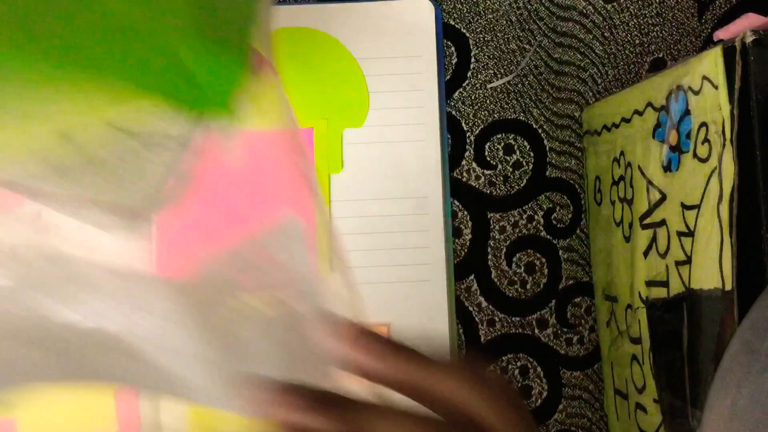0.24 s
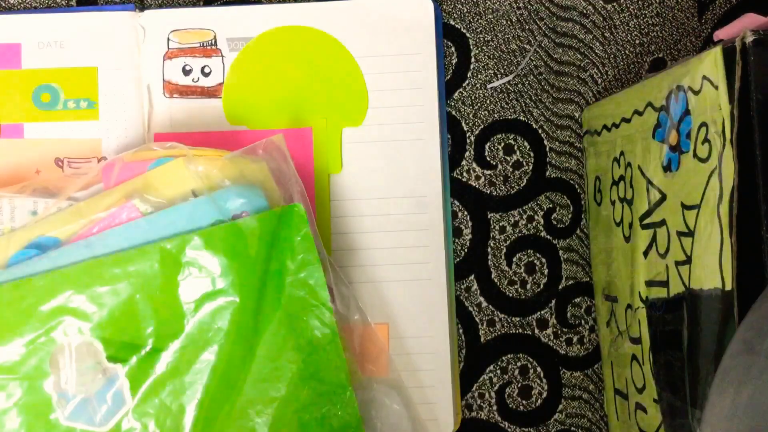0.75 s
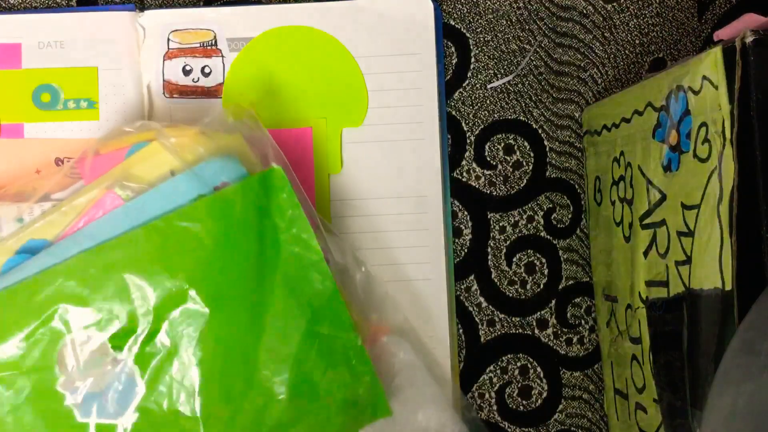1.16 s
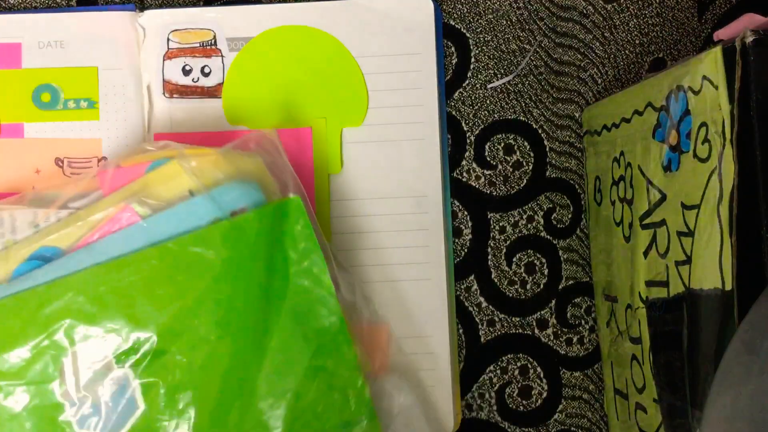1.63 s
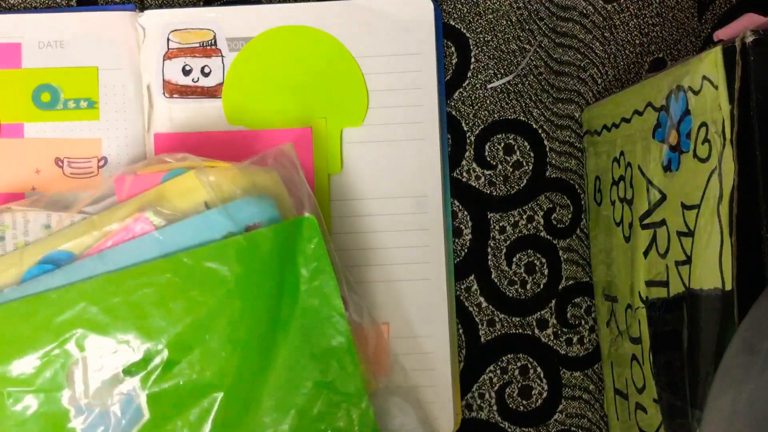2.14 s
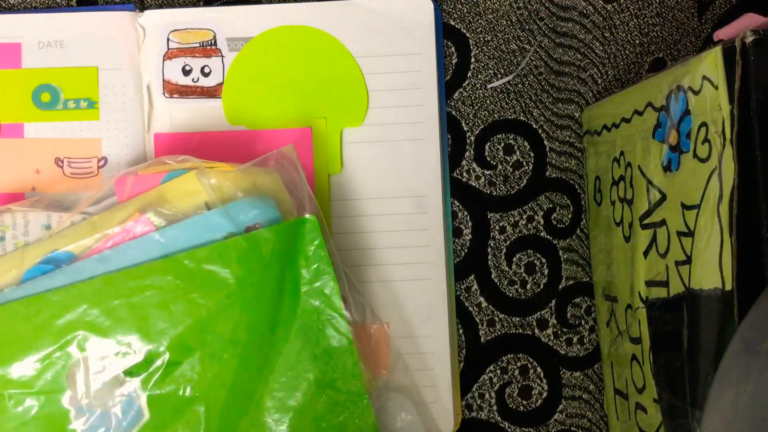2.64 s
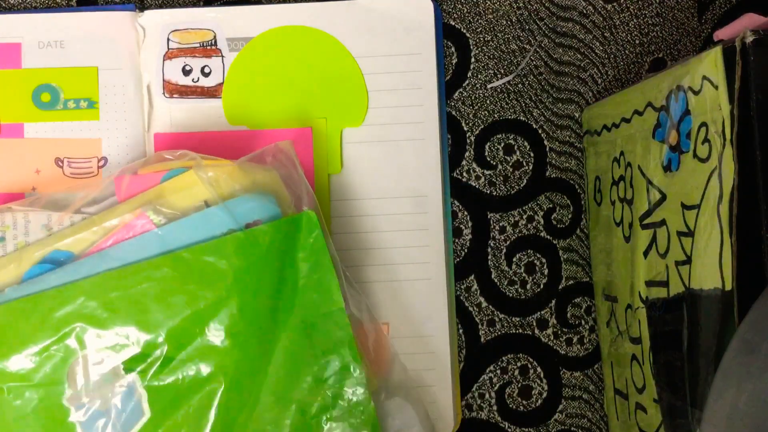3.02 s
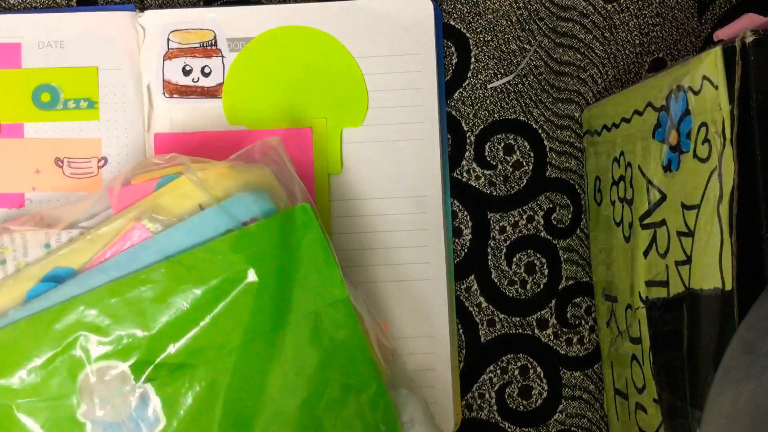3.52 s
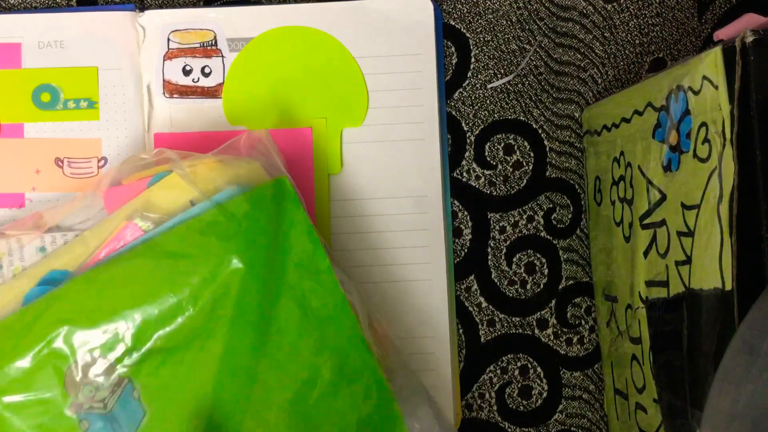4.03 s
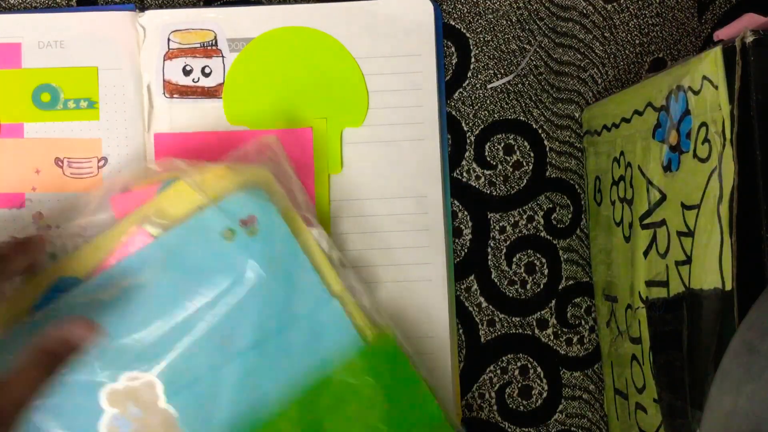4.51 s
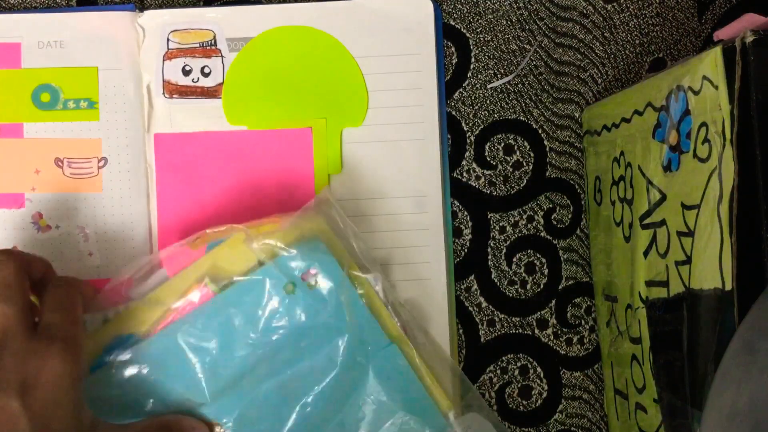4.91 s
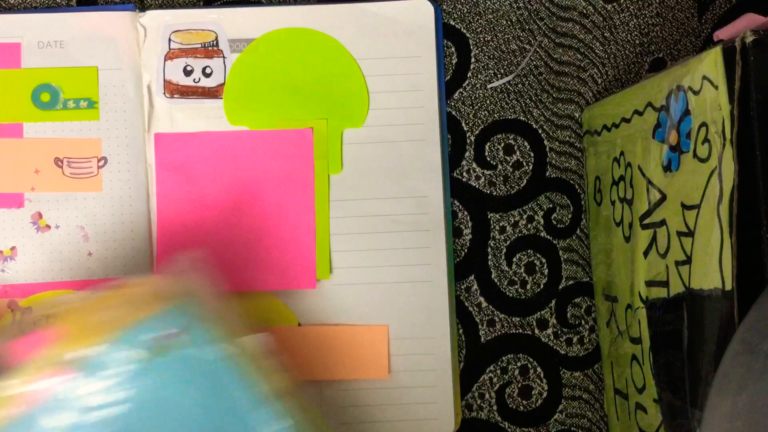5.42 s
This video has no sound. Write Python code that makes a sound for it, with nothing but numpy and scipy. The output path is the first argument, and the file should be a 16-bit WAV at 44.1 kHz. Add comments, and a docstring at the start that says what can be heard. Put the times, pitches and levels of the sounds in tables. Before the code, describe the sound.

A close, dry take in a small quiet room with a very faint low mains hum, rumble and slight hiss. From 0 to 0.3 s a thin plastic packet is carried, with light, quickening crackles. At about 0.35-0.48 s it lands on an open notebook: a loud, crisp flurry of tiny bounces and film snaps with a soft papery knock. Until 2 s it settles in scattered crinkles and short rustles, with dull little thuds near 0.8 and 1.8 s and a faint airy swish around 1.6 s. From 2.0 to 2.8 s it is nearly still, with only tiny ticks. From 2.85 to 4.2 s nudging brings denser, rounder crinkles, strongest near 3.25 s with a soft bump, and a sharp snap at 3.9 s. From 4.3 s a sustained, grainy, bright drag over paper crackles continuously, with brief swishes and soft thuds at 4.6 and 5.1 s, thinning away by 5.65 s.

```python
"""A thin plastic packet of sticky notes is dropped on an open paper notebook, nudged about and then dragged off the page.
Carried, landing and pushed, its film rustles grainily in filtered noise, and creases snap in short ringing bursts.
The landing bounces excite brief resonances, the packet's weight thuds softly, and gliding bands of noise make swishes.
A mains hum, a low rumble and faint hiss fill the small, dry room; one close microphone."""
import sys
import numpy as np
from scipy import signal
from scipy.fft import rfft, irfft, next_fast_len
from scipy.io import wavfile
from scipy.ndimage import uniform_filter1d, map_coordinates

SR = 44100
rng = np.random.default_rng(int(sys.argv[2]) if len(sys.argv) > 2 else 0)


def pcm_store(signal):
    """Save signal as 16-bit PCM."""
    levels = np.round(np.clip(np.atleast_2d(signal), -1, 1) * 32767)
    wavfile.write(sys.argv[1], SR, levels.astype(np.int16).T)


N = 249606


def from_db(db):
    """Decibels to amplitude gain."""
    return 10 ** (np.asarray(db) / 20)


def rms_one(x):
    """Scale to an rms of one."""
    return x / np.sqrt(np.mean(x ** 2) + 1e-20)


def in_time(rows):
    """The columns of a curve table, interpolated at every sample."""
    s, *columns = np.transpose(rows)
    return [np.interp(np.arange(N) / SR, s, column) for column in columns]


def drift(rate):
    """Random wander of spread one, in straight lines between `rate` random points a second."""
    knots = rng.standard_normal(4096)
    wander = np.interp(np.arange(N) / SR * rate, np.arange(len(knots)), knots)
    return wander * np.sqrt(3 / 2)  # makes up for the spread lost between points


def band(x, low_hz, high_hz, order=3):
    """Butterworth band-pass."""
    edges = [low_hz, min(high_hz, SR / 2 - 1000)]
    return signal.sosfilt(signal.butter(order, edges, "band", fs=SR, output="sos"), x)


def coloured(x, spectrum):
    """Give each row of x a smooth spectrum, causally (minimum phase)."""
    size = next_fast_len(x.shape[-1], True) * 2
    hz, db = np.transpose(spectrum)
    bins_hz = np.arange(size // 2 + 1) * SR / size
    log_gain = np.log(from_db(np.interp(np.log(bins_hz + 1), np.log(hz), db)))
    # folding the cepstrum forward in time gives minimum phase
    cepstrum = irfft(log_gain)[:size // 2]
    cepstrum[1:] *= 2
    response = np.exp(rfft(cepstrum, size))
    return irfft(rfft(x, size) * response)[..., :x.shape[-1]]


def resonance(x, hz, width_hz):
    """Two-pole resonance with a gain of one on top."""
    r = np.exp(-np.pi * width_hz / SR)
    top = (1 - r * r) / 2
    return signal.lfilter([top, 0, -top], [1, -2 * r * np.cos(2 * np.pi * hz / SR), r * r], x)


def narrow_noise(hz, width_hz):
    """Noise in a narrow band round a steady or gliding pitch; rms one."""
    lowpass = signal.butter(2, width_hz / 2, fs=SR, output="sos")
    spread = signal.sosfilt(lowpass, rng.standard_normal((2, len(hz))))
    phase = 2 * np.pi * np.cumsum(hz) / SR
    return rms_one(spread[0] * np.cos(phase) + spread[1] * np.sin(phase))


# Colour of the quiet room's noise. Each row: frequency in Hz, relative level in dB.
ROOM_COLOUR = [(20, -4.5), (33, -25), (48, 6), (68, 6), (100, 0), (175, -3), (260, -15), (500, -19),
               (1200, -29.5), (2500, -33.5), (6000, -42), (13000, -39.5), (15500, -57)]
# The room's low rumble. Each row: time in seconds, gain in dB on the lows of the room noise.
RUMBLE_CURVE = [(0, -57.5), (1.3, -61.5), (1.7, -61.5), (2.4, -58), (2.8, -70), (5.66, -64)]
HUM_HZ, HUM_DB, HISS_DB = 119.9, -60.0, -59


def background(waver_db=1.3, blur_db=-12.5, blur_width_hz=28.0):
    """A wavering, slightly blurred mains hum over rumble and faint hiss."""
    tone = np.sqrt(2) * np.sin(2 * np.pi * HUM_HZ * np.arange(N) / SR)
    blur = from_db(blur_db) * narrow_noise(np.full(N, HUM_HZ), blur_width_hz)
    hum = (tone + blur) * from_db(HUM_DB + waver_db * drift(12))
    air = rms_one(coloured(rng.standard_normal(N), ROOM_COLOUR))
    rumble = signal.sosfilt(signal.butter(1, 200, fs=SR, output="sos"), air)
    hiss = air - rumble
    rumble_db, = in_time(RUMBLE_CURVE)
    return hum + from_db(rumble_db) * rumble + from_db(HISS_DB) * hiss


RUSTLE_RISE_SHARE, RELEASE_S = 0.32, 0.035  # a long rustle swells slowly: rise is a share of length
# the film's upper ranges against its body; the crackle takes a share of the brightness
CRACKLE_DB, SIZZLE_DB, CRACKLE_FOLLOWS = -2.5, -13, 0.44


def stroke(start, end, rise_s, db, bright_db):
    """Power of one movement, swelling, holding and dying away, in the body, crackle and sizzle ranges."""
    t = np.arange(N) / SR
    before, after = np.maximum(start - t, 0), np.maximum(t - end, 0)
    envelope = np.exp(-before / rise_s - after / RELEASE_S) + 1e-9
    ranges = (0, CRACKLE_DB + CRACKLE_FOLLOWS * bright_db, SIZZLE_DB + bright_db)
    return np.array([(envelope * from_db(db + range_db)) ** 2 for range_db in ranges])


# Rustles of the film as the packet is carried, lands and is pushed over the page.
# Each row: start in seconds, length in seconds, level in dB before the range gains, brightness in dB.
RUSTLE_ROWS = [(0.015, 0.091, -62, 2.5), (0.2, 0.094, -65.5, 10), (0.361, 0.044, -36, 7),
               (0.412, 0.087, -45, 3.5), (0.52, 0.1, -56.5, 7.5), (0.648, 0.033, -55.5, 1),
               (0.789, 0.1, -56, -1), (0.957, 0.052, -63, 1), (1.086, 0.066, -54, 6),
               (1.176, 0.12, -65, -7), (1.444, 0.16, -58, 6.5), (1.61, 0.098, -58.5, 5.5),
               (1.742, 0.13, -61.5, 2), (1.961, 0.22, -58.5, -17.5), (2.173, 0.11, -63, -24),
               (2.119, 0.036, -72.5, 15), (2.406, 0.037, -67.5, -3), (2.837, 0.1, -55, -8),
               (3.078, 0.16, -51, -5), (3.233, 0.013, -46.5, -4), (3.35, 0.13, -57.5, -4),
               (3.476, 0.061, -50, 1.5), (3.633, 0.049, -60.5, -5), (3.69, 0.08, -73.5, 9),
               (3.91, 0.12, -52, 2.5), (4.095, 0.07, -60, 5)]
# The long drag off the page. Each row: time in seconds, level in dB before the range gains, brightness in dB.
DRAG_CURVE = [(4.2, -59.5, -4), (4.28, -59.5, 11), (4.43, -47.5, 8.5), (4.7, -45, 6), (4.8, -47.5, 9.5),
              (4.93, -50.5, 2), (5.07, -47, 15), (5.14, -47, 9), (5.27, -48.5, 8.5), (5.4, -50.5, 2),
              (5.52, -55, -6.5), (5.657, -69.5, 11)]
DRAG_RISE_S = 0.02
RESTING_DB, RESTING_BRIGHT_DB = -84, -7  # the film stirs faintly throughout


def rubbing_levels():
    """Rustles, then the drag, over a faint resting stir; dB in the body, crackle and sizzle ranges."""
    end = (N - 1) / SR
    power = stroke(0, end, DRAG_RISE_S, RESTING_DB, RESTING_BRIGHT_DB)
    power += stroke(DRAG_CURVE[0][0], end, DRAG_RISE_S, *in_time(DRAG_CURVE))
    for s, length, db, bright_db in RUSTLE_ROWS:
        power += stroke(s, s + length, RUSTLE_RISE_SHARE * length, db, bright_db)
    return 10 * np.log10(power)


# the rate of buckling at a reference rubbing level, and how far it follows that level
CRINKLES_PER_S, CRINKLES_AT_DB, CRINKLES_FOLLOW = 190.0, -48.0, 0.45


def buckling(level_db, size_db=5.0):
    """Small creases buckle at random moments, more often the harder the film is rubbed."""
    sizes = from_db(size_db * rng.exponential(1, N).clip(0, 2.8))
    per_s = CRINKLES_PER_S * from_db(CRINKLES_FOLLOW * (level_db - CRINKLES_AT_DB))
    return (rng.random(N) < per_s / SR) * sizes * rng.choice([-1, 1], N)


def crinkles(buckles, low_hz, high_hz, facet_q=7.4, click_db=-17.5, count=16):
    """Each buckle clicks and rings up to three of the film's many facets in this range."""
    dealt = rng.integers(0, count, (3, N))
    rings = np.zeros(N)
    for k, hz in enumerate(np.geomspace(high_hz / 4, high_hz * .9, count)):
        struck = buckles * (dealt == k).any(axis=0) + 1e-18
        rings += resonance(struck, hz, hz / facet_q) * (-1) ** k
    return rings + from_db(click_db) * buckles


# Colour of film on paper, heard in rubbing and snaps. Each row: frequency in Hz, relative level in dB.
FILM_COLOUR = [(100, 11), (200, 0.5), (330, 0), (480, -5), (680, 0.5), (1100, 0), (1600, -4.5), (2500, -5),
               (4000, -7.5), (6000, -9), (8500, -11.5), (12500, -14), (14500, -20), (16000, -31)]
# The body, crackle and sizzle ranges of the film, for rubbing and snaps. Each row: low edge in Hz, high edge
# in Hz, snap decay in seconds, snap gain in dB, rubbing gain in dB, weight of crinkles from 0 to 1.
FILM_RANGES = [(147, 1380, 0.0048, -3, -0.63, 0.92), (1305, 4860, 0.0041, -0.5, -3.5, 1.0),
               (4730, 14800, 0.0017, -0.5, -0.5, 0.67)]
# How much of the rubbing is crinkling rather than smooth sliding.
# Each row: time in seconds, share from 0 to 1 before the range's weight.
CRINKLING_CURVE = [(0, 0.4), (.35, 0.37), (1.2, 0.33), (1.45, 0.24), (1.7, 0.14), (2.25, 0.4), (2.8, 0.75),
                   (4.1, 0.76), (4.3, 0.16), (4.8, 0.45), (5.6, 0.43)]


def rubbing(slips_per_s=380.0, slip_db=2.0, slip_s=0.0019, smooth_share=0.45, flutter_db=3.5, jerk_db=1.9):
    """Tiny slips crowd into a grainy friction hiss, and small creases crinkle among them."""
    slip_power = from_db(slip_db * np.minimum(rng.exponential(1, N), 4)) ** 2
    slips = (rng.random(N) < slips_per_s / SR) * slip_power
    power = signal.lfilter([1], [1, -np.exp(-1 / (slip_s * SR))], slips + 1e-18)
    smooth = np.clip(smooth_share, 0, 1)
    grain = np.sqrt(smooth + (1 - smooth) * power / power.mean())
    crinkling, = in_time(CRINKLING_CURVE)
    levels_db = rubbing_levels()
    buckles = buckling(levels_db[0])
    out = np.zeros(N)
    for (low, high, _, _, rub_db, weight), level_db in zip(FILM_RANGES, levels_db):
        share = np.clip(weight * crinkling, 0, 1)
        flutter = from_db(flutter_db * np.sqrt(share) * drift(70))
        friction = grain * rng.standard_normal(N) * flutter
        layers = np.array([friction, crinkles(buckles, low, high)])
        friction, crinkle = band(coloured(layers, FILM_COLOUR), low, high)
        # even out the crinkles' average strength so that it follows the rubbing
        crinkle = rms_one(crinkle)
        crinkle /= np.sqrt(uniform_filter1d(crinkle ** 2, SR // 16) + .02)
        mix = np.sqrt(1 - share) * rms_one(friction) + np.sqrt(share) * crinkle
        out += from_db(level_db + rub_db) * mix
    # the packet moves in small jerks
    return out * from_db(jerk_db * crinkling * drift(55))


def page_echo(x, delay_s=0.000796, wander=0.34, echo_db=-16.5):
    """The page reflects the packet; the gap between them keeps changing, and the colour with it."""
    gain = from_db(echo_db)
    delay = delay_s * SR * np.exp(wander * drift(7.6))
    echo = map_coordinates(x, [np.arange(N) - delay], order=3)
    return (x + gain * echo) / np.sqrt(1 + gain ** 2)


# The loudest creases snapping. Each row: time of the buckle in seconds, strength in dB before the range gains,
# sizzle relative to strength in dB, pitch of the facet in Hz.
SNAP_ROWS = [(0.029, -61, 5, 6290), (0.0381, -54, -11, 2190), (0.055, -59, 5, 1090),
             (0.0835, -56.5, -5, 2080), (0.119, -57.5, 5.5, 8200), (0.174, -60, -8, 1500),
             (0.1843, -54.5, -13, 2500), (0.2104, -48, -5, 2570), (0.232, -58, -7, 3300),
             (0.2612, -54, -7, 3190), (0.2746, -60, -19, 1440), (0.2888, -45, -8, 2080),
             (0.3158, -50, -1, 2000), (0.3449, -43.5, 4, 910), (0.349, -41.5, 4.5, 990),
             (0.373, -40, -0.5, 5700), (0.388, -36.5, -6, 2390), (0.398, -37, -12, 1470),
             (0.416, -42, -5, 4370), (0.4345, -43, -19, 2300), (0.4688, -40, -12, 2300),
             (0.481, -45, -3, 3420), (0.558, -44, -7, 880), (0.662, -45.5, -31, 990),
             (0.7063, -55, -17, 2380), (0.7614, -54, -5, 1080), (0.8103, -55, -20, 1290),
             (0.8451, -46.5, -9, 3120), (0.8787, -64, -19, 1030), (0.9599, -48.5, -1, 3230),
             (0.9961, -49, -1.5, 2260), (1.006, -47, -0.5, 4630), (1.0945, -44, -9.5, 2700),
             (1.1041, -44.5, -16, 3740), (1.1205, -42, -2.5, 3500), (1.1481, -44.5, -1, 3800),
             (1.1768, -57, -15, 3360), (1.2536, -48.5, -2, 3160), (1.2665, -60.5, 0, 6200),
             (1.3583, -70, 7.5, 9400), (1.3777, -57.5, -24, 765), (1.456, -56, -11, 1200),
             (1.494, -48.5, -3, 3650), (1.5096, -50.5, -4, 5150), (1.5932, -52, -19, 1550),
             (1.7438, -54, -18, 2290), (1.77, -42.5, -6.5, 2450), (1.821, -43.5, -12.5, 1380),
             (1.8543, -57.5, -7, 3120), (1.881, -49, -23, 1310), (1.9382, -63, -20, 1120),
             (1.9827, -51.5, -11.5, 1790), (2.0957, -64, -16, 1200), (2.1327, -50.5, 7, 11400),
             (2.2105, -54.5, -26, 1260), (2.2222, -60, -11, 4200), (2.402, -60.5, -14, 3360),
             (2.4628, -61.5, -10, 3560), (2.477, -67, -15, 3200), (2.5715, -67.5, 6, 4200),
             (2.848, -48.5, -2, 714), (2.8701, -51, -21, 1120), (2.8809, -46.5, -10, 590),
             (2.8929, -49.5, -4, 1530), (2.9285, -42, -8, 1190), (2.9412, -46.5, 5, 6900),
             (2.951, -41.5, -7, 1140), (2.9966, -46.5, 1, 3020), (3.015, -63, -15, 2150),
             (3.0473, -52, -23, 1220), (3.0639, -44.5, -16, 1870), (3.0697, -51, 3, 9000),
             (3.077, -43, 3.5, 2480), (3.1167, -43.5, -12, 1570), (3.158, -43, -1.5, 2330),
             (3.1715, -57, -19, 1130), (3.214, -44.5, 0.5, 2410), (3.2416, -38, -22, 550),
             (3.254, -37.5, -17, 735), (3.28, -43.5, -33, 1340), (3.2961, -49, -3, 603),
             (3.3397, -40, -8.5, 3100), (3.3612, -48.5, -14, 3050), (3.402, -51.5, -24, 2320),
             (3.4147, -49, -22, 1800), (3.428, -54.5, -8, 1880), (3.4535, -45, -11, 1940),
             (3.4828, -45, -0.5, 2660), (3.5237, -41, -12, 1010), (3.551, -48, -23, 1500),
             (3.641, -51, -24, 950), (3.6545, -49, -14, 1000), (3.6604, -48, -2, 1020),
             (3.6816, -54, -12, 1470), (3.86, -46.5, -24, 1070), (3.9012, -37.5, -7, 630),
             (3.924, -44.5, 4, 1020), (3.9365, -41.5, -1.5, 4700), (3.9523, -57, 2, 1160),
             (3.9632, -51, -3, 2325), (4.0322, -51, -7, 5000), (4.0555, -50.5, 4.5, 4170),
             (4.119, -52, -20, 1110), (4.1345, -57, -18, 1820), (4.1656, -39.5, -11.5, 1530),
             (4.244, -46.5, -30, 900), (4.29, -53, -9, 1070), (4.3677, -57.5, 0, 3900),
             (4.4314, -44, -3, 563), (4.4358, -44.5, 2.5, 585), (4.465, -47.5, 3, 1200),
             (4.481, -47, 6.5, 9600), (4.5093, -43, -3, 646), (4.558, -51, 3, 2870),
             (4.6046, -41, -1, 1260), (4.6525, -33.5, -14, 1850), (4.659, -44, -22, 1680),
             (4.712, -41, -8, 1000), (4.7271, -43, 0, 7160), (4.7549, -43.5, -3, 2200),
             (4.848, -50, -1, 1080), (4.8816, -48, -19, 3600), (4.911, -36, -32, 960),
             (4.964, -44.5, -3, 930), (4.982, -46.5, -2, 2380), (5.0086, -40.5, -7, 2470),
             (5.0127, -41.5, -2, 4340), (5.023, -37, -20, 1270), (5.03, -41, -22, 1180),
             (5.0545, -42.5, -20, 1920), (5.0783, -52, 18, 9000), (5.085, -38.5, -0.5, 1240),
             (5.135, -40, -7, 890), (5.1625, -35, -5, 1100), (5.202, -45.5, -7, 3680),
             (5.2422, -38, -24, 1570), (5.2533, -35, -9.5, 1610), (5.289, -46, 4, 10000),
             (5.338, -37, -10, 1130), (5.393, -49.5, -4, 2450), (5.4095, -58.5, 12.5, 5570),
             (5.4203, -41, -22, 1560), (5.445, -72, -12, 3790), (5.4678, -43.5, -28, 2240),
             (5.4926, -37.5, -11.5, 1040), (5.5111, -47, -22, 1700), (5.5438, -50.5, -15, 2520),
             (5.5911, -44.5, -30, 1700), (5.621, -55, -7, 5800)]
# the smaller the facet, the higher it rings and the more it crackles against the body
MIDDLE_FACET_HZ, CRACKLE_GAIN_DB_PER_OCTAVE = 1516, 2


def snap_levels():
    """Level of every snap in the body, crackle and sizzle ranges, in dB before the range gains."""
    _, db, sizzle_db, hz = np.transpose(SNAP_ROWS)
    octaves = np.clip(np.log2(hz / MIDDLE_FACET_HZ), -.5, 1.3)
    return db, db + CRACKLE_GAIN_DB_PER_OCTAVE * octaves, db + sizzle_db


def snaps(facet_db=12.5, facet_q=5.2, tail_db=-21.5, tail_s=0.021,
          neighbour_db=9.5, neighbour_q=27.0, neighbour_octaves=0.707,
          lead_in_db=-13.0, lead_in_s=0.0061, crack_db=4.0, crack_s=0.00053):
    """A crease buckles and dies in milliseconds; its facet rings at its own pitch and a neighbour joins in."""
    lead = SR // 100  # samples before the buckle
    table = np.array(SNAP_ROWS)
    times, facets_hz = table[:, 0], table[:, 3]
    t = (np.arange(2560) - lead) / SR
    age = abs(t)
    out = np.zeros(N + len(t))
    detune = 2 ** (neighbour_octaves * rng.uniform(-1, 2, len(table)))
    neighbours_hz = np.minimum(facets_hz * detune, SR / 3)
    # noise swells for a few milliseconds before each snap
    lead_in = from_db(lead_in_db) * np.exp(-age / lead_in_s)
    for (low, high, decay_s, snap_db, _, _), levels_db in zip(FILM_RANGES, snap_levels()):
        # a sharp crack, the buckle itself, then a faint shiver spreading through the film
        crack = from_db(crack_db) * np.exp(-age / crack_s)
        shiver = from_db(tail_db) * np.exp(-age / tail_s)
        envelope = np.where(t < 0, lead_in, crack + np.exp(-age / decay_s) + shiver)
        bursts = rng.standard_normal((len(table), len(t))) * envelope
        for i, (hz, near_hz) in enumerate(zip(facets_hz, neighbours_hz)):
            facet = from_db(facet_db) * resonance(bursts[i], hz, hz / facet_q)
            neighbour = from_db(neighbour_db) * resonance(bursts[i], near_hz, near_hz / neighbour_q)
            bursts[i] += facet + neighbour
        bursts = band(coloured(bursts, FILM_COLOUR), low, high)
        # level is set over the first 5 ms of the buckle
        bursts /= bursts[:, lead:lead + SR // 200].std(axis=1, keepdims=True)
        for s, db, burst in zip(times, levels_db, bursts):
            start = int(np.clip(s * SR - lead, 0, N))
            out[start:start + len(t)] += from_db(db + snap_db) * burst
    return out[:N]


# The packet lands in a quick run of bounces.
# Each row: time in seconds, strength in dB before mode levels and scatter.
LANDING_BOUNCES = [(0.348, -29), (0.362, -36.5), (0.380, -22), (0.389, -23), (0.3975, -22), (0.412, -25),
                   (0.429, -29), (0.466, -35)]
# Resonances of the packet on the page. Each row: frequency in Hz, width in Hz, relative level in dB.
PACKET_MODES = [(106, 27, -20.5), (161, 25, -21), (675, 15, -22), (843, 25, -17), (870, 120, -10.5),
                (917, 24, -16.5), (2380, 5.8, -29)]


def landing(scatter_db=-1.5):
    """Every bounce sets the packet's resonances ringing, each with a strength of its own."""
    s, db = np.transpose(LANDING_BOUNCES)
    out = np.zeros(N)
    for hz, width, mode_db in PACKET_MODES:
        contacts = np.full(N, 1e-18)
        scatter = scatter_db * rng.standard_normal(len(s))
        contacts[(s * SR).astype(int)] = from_db(db + mode_db + scatter)
        out += resonance(contacts, hz, width) * SR / (2 * np.pi * width)
    return out


# The weight of the packet shifting on the notebook. Each row: start in seconds, level at the peak in dB.
THUD_ROWS = [(0.376, -52.5), (0.767, -49.5), (1.127, -55), (1.5, -66), (1.8, -54.5), (2.19, -61),
             (2.857, -50.5), (3.252, -46), (4.56, -48), (5.136, -45.5)]


def thuds(low_hz=74.5, high_hz=258.0, swell_s=0.0096):
    """Soft, dull thuds of the packet on the pages: low noise that swells and fades."""
    t = np.arange(N) / SR
    push = np.zeros(N)
    for s, db in THUD_ROWS:
        age = np.maximum(t - s, 0) / swell_s
        push += from_db(db) * age * np.exp(1 - age)
    return push * rms_one(band(rng.standard_normal(N), low_hz, high_hz, order=2))


# Sliding film hisses in narrow bands that glide as it bends.
# Each row: start in seconds, length in seconds, level at the peak in dB, first pitch in Hz, last pitch in Hz.
SWISH_ROWS = [(1.395, 0.15, -74, 11900, 11800), (1.53, 0.21, -67, 11800, 12900),
              (1.534, 0.22, -59.5, 2810, 3080), (1.541, 0.2, -62.5, 4900, 4500),
              (4.547, 0.11, -54, 9350, 9800), (4.761, 0.065, -49.5, 8400, 9800),
              (4.97, 0.061, -55, 12000, 12800)]


def swishes(q=5.2):
    """Each glide of the film is a gliding band of noise that swells and fades smoothly."""
    out = np.zeros(N)
    for s, length, db, first_hz, last_hz in SWISH_ROWS:
        start, size = int(s * SR), int(length * SR)
        hiss = narrow_noise(np.linspace(first_hz, last_hz, size), first_hz / q)
        out[start:start + size] += from_db(db) * np.hanning(size) * hiss
    return out


def reflections(x, t60=0.28, wall_hz=6000.0):
    """The dull, diffuse answer of a small furnished room: decaying noise after a 6 ms gap."""
    t = np.arange(SR // 2) / SR
    noise = band(rng.standard_normal(len(t)), 113.4, wall_hz, order=1)
    tail = noise * from_db(-60 * t / t60) * (t > .006)
    return signal.fftconvolve(x, tail / np.linalg.norm(tail))[:N]


def scene(room_db=-19.5):
    """The packet close by, its reflections and the room's own sound."""
    packet = page_echo(rubbing()) + snaps() + landing() + thuds() + swishes()
    return (packet + from_db(room_db) * reflections(packet) + background())[None]


CUTOFF_HZ = 16300


def record(dry):
    """The top of the treble is cut steeply by an elliptic low-pass."""
    return signal.sosfilt(signal.ellip(10, .1, 80, CUTOFF_HZ, fs=SR, output="sos"), dry)


dry = scene()
out = record(dry)
pcm_store(out)
```